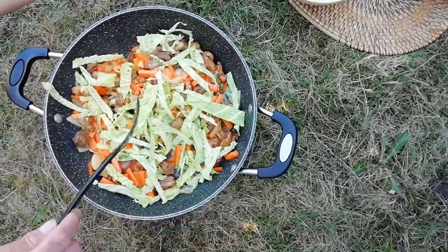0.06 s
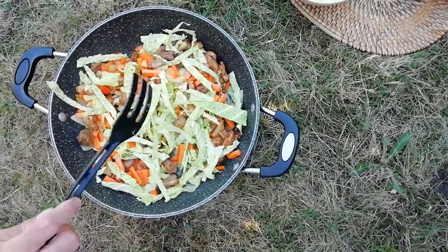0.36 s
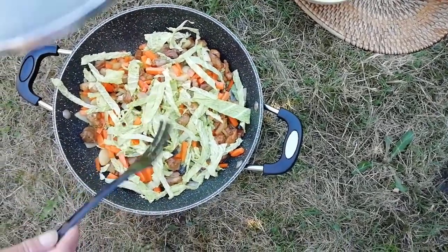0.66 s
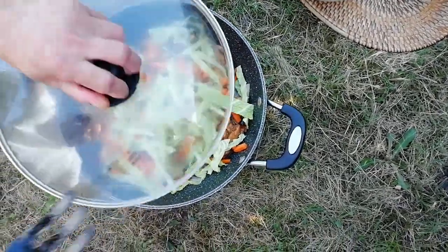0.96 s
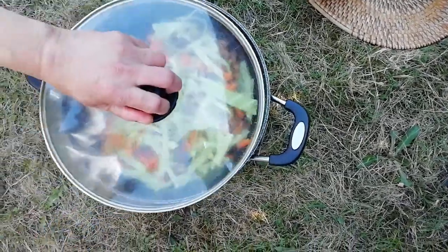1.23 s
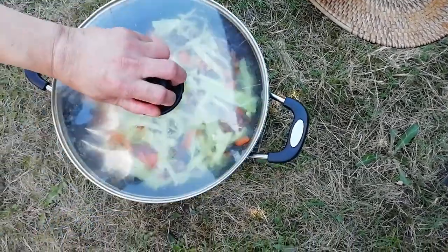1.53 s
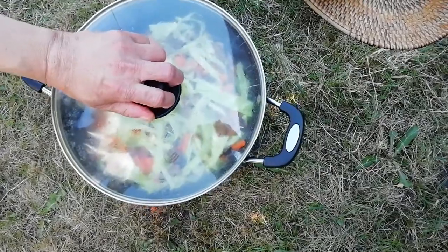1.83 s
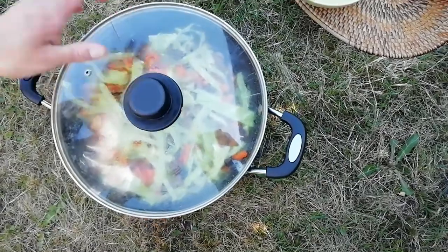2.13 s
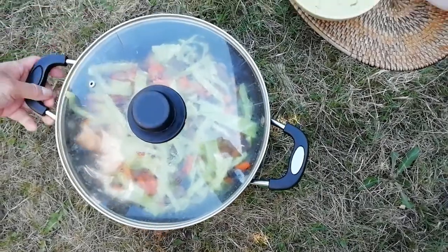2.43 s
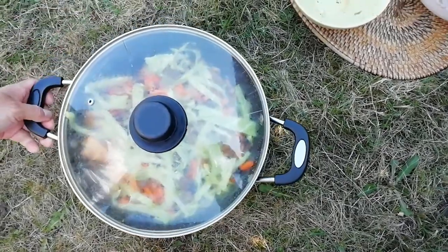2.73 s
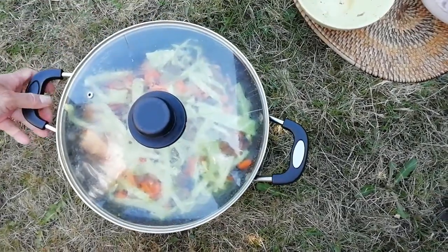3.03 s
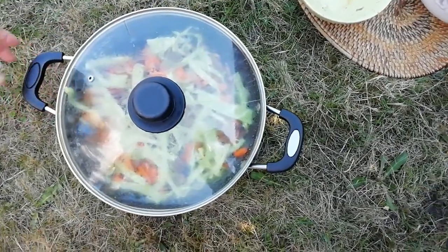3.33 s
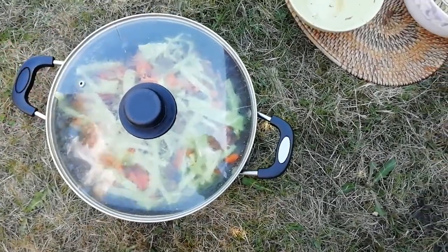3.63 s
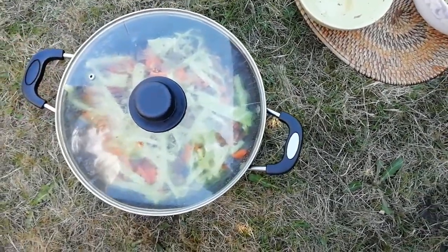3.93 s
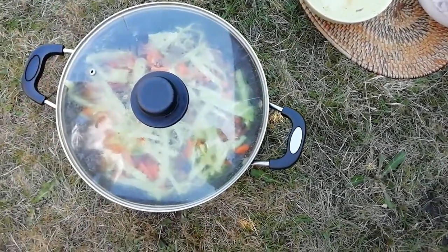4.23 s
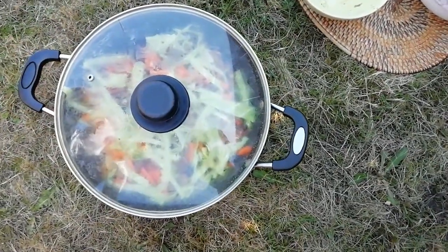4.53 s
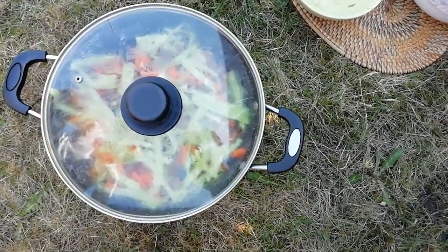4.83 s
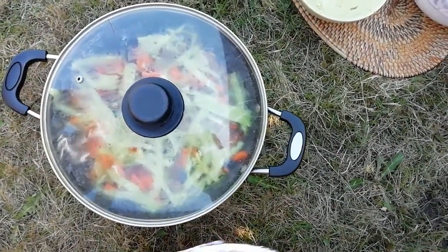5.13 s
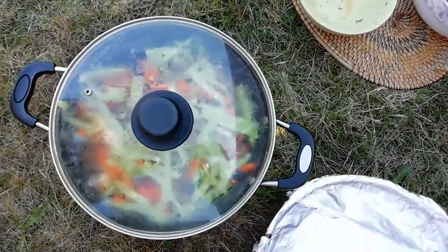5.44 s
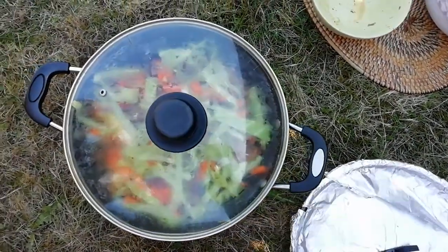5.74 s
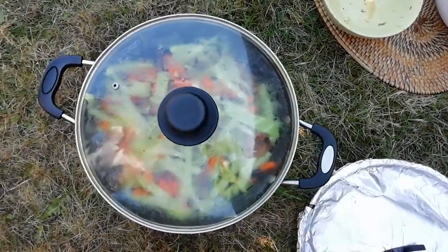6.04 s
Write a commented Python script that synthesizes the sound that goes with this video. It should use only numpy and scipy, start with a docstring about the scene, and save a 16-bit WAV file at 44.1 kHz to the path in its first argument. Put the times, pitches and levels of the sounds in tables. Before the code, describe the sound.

A frying sizzle is shut in by a rattling glass lid, followed by faint birdsong and a crackling bag dragged outdoors.

```python
"""Vegetables sizzle in a frying pan on a lawn as droplets burst in the hot fat. A fork ticks, then
a glass lid clatters onto the rim, rings and shuts the sizzle in. The pan is nudged by its handle;
a foil-lined bag is bumped, dragged crackling over the grass and set down beside it. Small birds
sing in the trees over a far low drone, with one run of faint high ticks. A camera with two
differently coloured microphone ports is held above the pan."""
import sys
import numpy as np
from scipy import signal
from scipy.fft import rfft, irfft, next_fast_len
from scipy.io import wavfile
from scipy.ndimage import map_coordinates

SR = 44100
rng = np.random.default_rng(int(sys.argv[2]) if len(sys.argv) > 2 else 0)


def master_out(mix):
    """Clip the mix to full scale and print it as 16-bit PCM to the path in sys.argv[1]."""
    frames = np.transpose(np.atleast_2d(mix))
    ceiling = np.clip(frames, -1, 1)
    pcm = np.round(ceiling * 32767).astype(np.int16)
    wavfile.write(sys.argv[1], SR, pcm)


N = 268392
T = np.arange(N) / SR


# sizzle leaving the pan: time_s, level_db, covered_share
SIZZLE_ENVELOPE = [(0, -43.5, 0.1), (.45, -43, 0.14), (.72, -42, 0.08), (.9, -44.5, 0.27),
                   (1.05, -49.5, 0.83), (1.35, -54.5, 0.86), (1.6, -57, 1), (1.85, -73, 1), (2.4, -70.5, 1),
                   (3, -78, 0.7)]
# bursting fat: freq_hz, density_db
FAT_SPECTRUM = [(200, -27), (550, -18), (1000, -6), (2000, -1.5), (4500, -1), (8000, -1), (12000, -8),
                (15500, -6)]
# air between food and lid: centre_hz, width_hz, gain_db
CAVITY_MODES = [(1035, 59, 20), (1460, 78, 20), (2090, 430, 6.5), (2700, 270, 4.5)]
# droplet pings: start_s, level_db, pitch_hz
DROPLET_PINGS = [(.823, -36, 5000), (.862, -39, 4670), (.891, -32, 8100), (0.94, -31, 8040),
                 (.975, -35, 7750)]

def sizzle():
    """Droplets burst in hot fat; under the lid the hiss takes on the hollow of the pan."""
    time_s, level_db, covered_share = np.transpose(SIZZLE_ENVELOPE)
    fizz = crackle(rate_hz=2500, spread_db=4, spread_s=0.00006)
    pops = crackle(rate_hz=130, spread_db=3.5, spread_s=0.00006)
    fat = tinted(port_noise(shared=0.45) + amp(-1) * fizz + amp(-6.5) * pops, FAT_SPECTRUM)
    cavity = filtered(fat, lambda hz: resonances(CAVITY_MODES, hz))
    cavity_gain = amp(-8.5) * np.interp(T, time_s, covered_share)
    out = amp(np.interp(T, time_s, level_db) + 1.5 + 0.2 * wobble(24.6)) * (fat + cavity_gain * cavity)
    t = T[:SR // 20]
    for start_s, ping_db, pitch_hz in DROPLET_PINGS:
        add(out, start_s, amp(ping_db) * decay(t, t60_s=0.017) * np.sin(2 * np.pi * pitch_hz * t))
    return out


# lid on the rim: start_s, air_db, clack_db
LID_CONTACTS = [(1.367, -30, -32), (1.3777, -22, -23), (1.383, -35, -22), (1.428, -35, -39),
                (1.517, -30.5, -42), (1.538, -42, -34.5), (1.554, -28.5, -24), (1.572, -27.5, -29),
                (1.635, -21.5, -15), (1.646, -31, -27), (1.662, -30.5, -26), (1.679, -26, -30.5),
                (1.704, -24, -15.5), (1.723, -27, -45), (1.758, -25, -30)]
# steel-rimmed glass: base_hz, level_db, base_t60_s
LID_MODES = [(401, -12.5, 0.16), (507, -9.5, 0.1), (832, -8, 0.11), (906.5, -0.5, 0.11), (1110, -18, 0.064),
             (1420, -24, 0.15), (1683, -19, 0.184), (2110, -23, 0.078), (2355, -17, 0.097),
             (2414, -13.5, 0.1), (2688, -4.5, 0.054), (2910, -8.5, 0.051), (3110, -12, 0.064),
             (4900, -23, 0.053)]
# lid bedding down: time_s, air_hz, pitch_ratio, t60_ratio, glass_db, cutoff_hz
LID_SEATING = [(1.38, 380, 0.97, 0.92, -1, 5000), (1.52, 338, 0.95, 1.5, -3.5, 6500),
               (1.635, 272, .948, 1.09, 0, 3100), (1.704, 193, .94, 0.86, -15, 1500),
               (1.76, 173, .94, 0.93, -19, 1000)]
# hard contact on the pan: freq_hz, density_db
CLACK_SPECTRUM = [(50, -31), (160, 4.5), (450, -2), (650, -9), (1050, 1), (1700, -6.5), (2800, -15),
                  (6000, -11), (15000, -4)]

def lid():
    """Each contact clacks, rings the glass and pumps trapped air; lower and duller as the lid seats."""
    out, t = np.zeros((2, N)), T[:SR // 4]
    base_hz, mode_db, base_t60_s = np.transpose(LID_MODES)[:, :, None]
    for start_s, air_db, clack_db in LID_CONTACTS:
        air_hz, pitch_ratio, t60_ratio, glass_db, cutoff_hz = interpolate(LID_SEATING, start_s)
        # each new point of support shifts the modes
        mode_hz = base_hz * pitch_ratio * (1 + 0.0133 * rng.standard_normal(base_hz.shape))
        polarity = rng.choice([-1, 1], base_hz.shape)
        struck_db = mode_db + 2.4 * rng.standard_normal(base_hz.shape)
        envelopes = polarity * amp(struck_db) * decay(t, base_t60_s * t60_ratio)
        # higher modes reach the ports further out of step
        skew_rad = rng.standard_normal(base_hz.shape) * base_hz / 6000
        phase = 2 * np.pi * mode_hz * t
        ring = np.array([np.sum(envelopes * np.sin(phase + side * skew_rad), axis=0) for side in (-1, 1)])
        add(out, start_s, amp(glass_db + (air_db + clack_db) / 2) * ring)
        # trapped air swells, then leaks through the gap
        air_envelope = (1 - np.exp(-t / 0.0013)) * decay(t, 0.078 * t60_ratio)
        add(out, start_s, amp(air_db + 3) * air_envelope * np.sin(2 * np.pi * air_hz * t))
        clack = burst(CLACK_SPECTRUM, t60_s=0.031, cutoff_hz=cutoff_hz, shared=0.66)
        rattle = burst(CLACK_SPECTRUM, t60_s=0.14 * t60_ratio, cutoff_hz=cutoff_hz, shared=0.33)
        add(out, start_s, amp(clack_db) * (clack + amp(-12.5) * rattle))
    return out


# fork on the pan: start_s, level_db
FORK_TAPS = [(.479, -52), (0.534, -32), (.619, -49)]
# one tap: freq_hz, density_db
FORK_SPECTRUM = [(200, -24), (600, -5), (900, -6), (1700, 9), (3000, -8), (6500, -9), (15000, -16)]

def fork():
    """The fork touches the pan through the food."""
    out = np.zeros((2, N))
    for start_s, level_db in FORK_TAPS:
        tap = burst(FORK_SPECTRUM, t60_s=0.034, cutoff_hz=13000, shared=0.64)
        add(out, start_s, amp(level_db) * tap)
    return out


# hand on the handle: centre_s, level_db, pitch_hz
HANDLE_BUMPS = [(2.234, -49, 70), (2.321, -38, 88), (2.374, -41.5, 137), (2.664, -43, 62),
                (2.7, -42.5, 63.6), (5.966, -48.5, 130)]
# pan shifting on grass: centre_s, half_width_s, level_db
PAN_SHIFTS = [(2.216, 0.06, -45.5), (2.68, 0.079, -51.5)]
# its rumble: freq_hz, density_db
SHIFT_SPECTRUM = [(15, -1), (35, 3), (70, -6.5), (170, -14), (300, -31), (900, -47)]

def pan_nudges(half_width_cycles=0.81):
    """The pan is nudged on soft ground: low pushes with no ring, and a soft rumble as it shifts."""
    pushes = np.zeros(N)
    for centre_s, level_db, pitch_hz in HANDLE_BUMPS:
        cycles = (T - centre_s) * pitch_hz
        pushes += amp(level_db) * np.exp(-(cycles / half_width_cycles) ** 2) * np.sin(2 * np.pi * cycles)
    shifting = sum(amp(level_db) * np.exp(-((T - centre_s) / half_width_s) ** 2)
                   for centre_s, half_width_s, level_db in PAN_SHIFTS)
    return pushes + shifting * tinted(port_noise(shared=0.93), SHIFT_SPECTRUM)


# bag moves: full_speed_s, rise_s, hold_s, fall_s, foil_db, wall_db
BAG_MOVES = [(3.427, 0.092, 0.13, 0.74, -61.5, -70.5), (3.519, .02, 0.017, .9, -72, -65.5),
             (4.193, .006, 0.034, 0.046, -49.5, -66), (4.256, 0.0044, 0.029, 0.031, -45, -57),
             (4.464, .01, 0.011, 0.11, -54, -54.5), (4.734, 0.21, 0.033, 0.075, -37.5, -45.5),
             (4.816, 0.064, 0.15, 0.062, -40.5, -50), (5.011, .01, 0.025, 0.019, -46.5, -54),
             (5.123, 0.018, 0.016, 0.29, -57.5, -67), (5.556, .2, .02, .1, -47, -56),
             (5.584, 0.062, 0.09, 0.14, -30, -37.5), (5.758, .008, .015, 0.08, -35, -39.5)]
# foil lining: freq_hz, density_db
FOIL_SPECTRUM = [(1200, -25.5), (2800, -8), (4500, -2.5), (6200, 2.5), (8000, -0.5), (11000, -0.5),
                 (15500, -1.5)]
# padded wall: freq_hz, density_db
WALL_SPECTRUM = [(150, -26), (400, -13.5), (800, -3), (1500, -0.5), (2600, -2), (4200, -13), (9000, -35)]

def bag_drag(ramp_db=20.5):
    """With each move, foil and fabric catch and slip on the grass."""
    catching = amp(1.82 * wobble(110))
    foil = port_noise(shared=0.075) + amp(-2.5) * crackle(rate_hz=1600, spread_db=5.5, spread_s=0.0002)
    foil += amp(-5) * crackle(rate_hz=110, spread_db=4.5, spread_s=0.0002)
    wall = port_noise(shared=0.44) + amp(-1) * crackle(rate_hz=900, spread_db=4.5, spread_s=0.00017)
    power = np.zeros((2, N))
    for full_speed_s, rise_s, hold_s, fall_s, foil_db, wall_db in BAG_MOVES:
        t = T - full_speed_s
        swell = amp(-ramp_db * (np.maximum(-t, 0) / rise_s + np.maximum(t - hold_s, 0) / fall_s))
        power += np.outer(amp([foil_db + 6.5, wall_db + 2]), swell) ** 2
    foil_gain, wall_gain = np.sqrt(power)
    return catching * (foil_gain * tinted(foil, FOIL_SPECTRUM) + wall_gain * tinted(wall, WALL_SPECTRUM))


# loudest foil creases: start_s, level_db, left_minus_right_db
CREASE_SNAPS = [(4.6633, -28, -3), (4.7261, -15.5, 7), (4.871, -19.5, 3.5), (5.029, -20.5, -1),
                (5.064, -31, 7), (5.2593, -29, 1), (5.3537, -33.5, -9), (5.4607, -28.5, -11),
                (5.5585, -12.5, -10), (5.5891, -7.5, -2), (5.6682, -7, 2), (5.7588, -14, -3)]
# bumps on the bag: start_s, level_db, t60_s
BAG_SCUFFS = [(3.685, -55, 0.028), (4.1849, -25.5, 0.12), (4.205, -26.5, 0.11), (4.218, -29, 0.097),
              (4.237, -34.5, 0.11), (4.255, -38.5, 0.2), (5.776, -38, 0.048)]
# one scuff: freq_hz, density_db
SCUFF_SPECTRUM = [(80, -48), (180, -10), (450, -4.5), (900, 1), (1700, 3.5), (2600, 0.5), (4000, -11.5),
                  (7000, -33), (15000, -28)]

def bag_impacts():
    """Foil creases snap and the padded wall scuffs."""
    out = np.zeros((2, N))
    for start_s, level_db, pan_db in CREASE_SNAPS:
        snap = burst(FOIL_SPECTRUM, t60_s=0.032, cutoff_hz=15000, shared=0.41)
        add(out, start_s, amp(level_db - 9.5) * panned(pan_db) * snap)
    for start_s, level_db, t60_s in BAG_SCUFFS:
        scuff = burst(SCUFF_SPECTRUM, t60_s, cutoff_hz=23000, shared=0.8)
        add(out, start_s, amp(level_db) * panned(-0.91) * scuff)
    return out


# rubbing weave: time_s, pitch_hz, level_db
WEAVE_HUM = [(4.27, 373, -63), (4.31, 402, -59), (4.4, 421, -60.5), (4.5, 483, -61), (4.62, 568, -61.5),
             (4.72, 579, -89)]

def bag_weave():
    """Ribbed fabric hums faintly, higher as it slides faster."""
    time_s, pitch_hz, level_db = np.transpose(WEAVE_HUM)
    hum = tone(np.interp(T, time_s, pitch_hz) * (1 + 0.148 * wobble(160)))
    return amp(np.interp(T, time_s, level_db, left=-120, right=-120)) * hum


# straight glides: start_s, length_s, from_hz, to_hz, level_db
SONG_SLURS = [(3.745, 0.065, 7000, 7250, -46), (3.803, .075, 7480, 8110, -44),
              (4.345, 0.068, 4380, 3600, -43.5), (4.391, .058, 4585, 3840, -42),
              (4.498, 0.025, 5520, 5960, -47.5), (4.618, 0.042, 4760, 4940, -44),
              (4.653, 0.069, 5350, 4220, -39.5), (4.956, .044, 4130, 3270, -42),
              (5.064, .03, 3490, 3035, -37), (5.151, 0.0526, 4250, 4770, -46),
              (5.188, 0.0545, 5150, 5400, -53), (5.213, 0.035, 3850, 3200, -46.5),
              (5.29, 0.036, 3133, 3004, -44)]
# slowing pitch swings: start_s, length_s, centre_hz, swing_count, depth_ratio, level_db
SONG_WARBLES = [(4.099, 0.12, 3240, 1.75, 0.067, -42), (4.992, 0.056, 3647, 0.71, 0.077, -41.5),
                (5.307, .19, 3200, 1.45, .11, -41.5)]

def singing_bird(slowing_exponent=0.8):
    """Slurs and warbles from one perch on the right; higher notes are rougher."""
    out = np.zeros((2, N))
    notes = [(start_s, level_db, np.linspace(from_hz, to_hz, int(length_s * SR)))
             for start_s, length_s, from_hz, to_hz, level_db in SONG_SLURS]
    for start_s, length_s, centre_hz, swing_count, depth_ratio, level_db in SONG_WARBLES:
        swing_rad = 2 * np.pi * swing_count * np.linspace(0, 1, int(length_s * SR)) ** slowing_exponent
        notes.append((start_s, level_db, centre_hz * (1 - depth_ratio * np.cos(swing_rad))))
    for start_s, level_db, glide_hz in notes:
        add(out, start_s, amp(level_db) * whistle(glide_hz, rasp=0.42 * (glide_hz.mean() / 4000) ** 0.6))
    return tree_scatter(panned(-6) * out, direct_db=-3.8, scatter_db=-6.3, t60_s=0.48)


# syllables, two per call: start_s, level_db
CHATTER_SYLLABLES = [(1.945, -53.5), (2.035, -56), (3.283, -49.5), (3.398, -52.5)]

def chattering_bird(pip_s=0.042, fall_s=0.055, fall_delay_s=0.022):
    """Each syllable is a short pip and a rasping fall."""
    out = np.zeros((2, N))
    pip_hz = np.full(int(pip_s * SR), 4120)
    fall_hz = np.linspace(3700, 2970, int(fall_s * SR))
    for start_s, level_db in CHATTER_SYLLABLES:
        add(out, start_s, amp(level_db - 2.5) * panned(1.8) * whistle(pip_hz, rasp=0.6))
        add(out, start_s + fall_delay_s, amp(level_db) * panned(-7) * whistle(fall_hz, rasp=1.88))
    return tree_scatter(out, direct_db=-6, scatter_db=-2.5, t60_s=0.55)


def whistle(glide_hz, rasp, right_lead_s=0.00016):
    """One gliding bird note, roughened by fast flutter and swelling unevenly; rms 1."""
    t, progress = T[:len(glide_hz)], np.linspace(0, 1, len(glide_hz))
    flutter, swelling = (map_coordinates(rng.standard_normal(512), [t * hz]) for hz in (600, 90))
    pitch_hz = glide_hz * (1 + 0.063 * rasp * np.tanh(flutter))
    phase = 2 * np.pi * (np.cumsum(pitch_hz) / SR + np.outer([0, right_lead_s], pitch_hz))
    envelope = (progress * (1 - progress)) ** 0.6 * amp(1.9 * swelling)
    return unit_rms(envelope * np.sin(phase))


def tree_scatter(x, direct_db, scatter_db, t60_s):
    """A far sound plus the diffuse tail that the trees scatter back."""
    t = T[:SR]
    tail = rng.standard_normal((2, SR)) * decay(t, t60_s) * (1 - np.exp(-t / 0.00074))
    scattered = signal.fftconvolve(x, tail / np.linalg.norm(tail[0]), axes=1)[:, :N]
    return amp(direct_db) * x + amp(scatter_db) * scattered


def high_ticks(count=6, start_s=3.857, spacing_s=0.0205, pitch_hz=14400, level_db=-51):
    """A quick even run of faint, very high ticks."""
    out, t = np.zeros((2, N)), T[:SR // 50]
    tick = amp(level_db) * decay(t, t60_s=0.007) * np.sin(2 * np.pi * pitch_hz * t)
    for k in range(count):
        add(out, start_s + k * spacing_s, tick)
    return out


# far drone: time_s, rumble_db, hum_db
DRONE_ENVELOPE = [(0, -59.5, -60.5), (2, -59, -59), (3.1, -63.5, -65), (3.85, -62, -56.5),
                  (4.4, -62.5, -68), (6.08, -63, -72)]
# far rumble: freq_hz, density_db
RUMBLE_SPECTRUM = [(15, 0), (35, 1), (60, -1.5), (79, 2.5), (100, -7.5), (135, -8), (168, -4.5), (215, -15),
                   (400, -24), (900, -56)]
# outdoor hiss: freq_hz, density_db
HISS_SPECTRUM = [(100, 3.5), (450, 0), (1200, 4.5), (2500, 1.5), (4500, -0.5), (7000, 0), (11000, -6.5),
                 (15500, -1)]

def outdoors(hum_hz=77.8):
    """A far low rumble with a wavering hum in it, and a faint even hiss."""
    rumble_db, hum_db = interpolate(DRONE_ENVELOPE, T)
    rumble = amp(rumble_db + 1.5 + wobble(6.16)) * tinted(port_noise(shared=1), RUMBLE_SPECTRUM)
    hum = amp(hum_db + 2 * wobble(14)) * tone(hum_hz * (1 + 0.04 * wobble(13)))
    hiss = amp(-61.5 + 0.83 * wobble(5.387)) * tinted(port_noise(shared=0.052), HISS_SPECTRUM)
    return rumble + hum + hiss


def crackle(rate_hz, spread_db, spread_s):
    """Tiny snaps of uneven size, each from its own direction; rms 1."""
    count = int(rate_hz * N / SR)
    position, size, direction = rng.random(count), rng.standard_normal(count), rng.uniform(-1, 1, count)
    snaps = amp(spread_db * np.minimum(size, 3)) * rng.choice([-1, 1], count)
    arrivals = [(position * N + side * direction * spread_s * SR).astype(int) % N for side in (-1, 1)]
    return unit_rms(np.array([np.bincount(samples, snaps, N) for samples in arrivals]))


def burst(spectrum, t60_s, cutoff_hz, shared):
    """Contact noise that dies fast; a softer contact has a lower cutoff."""
    t = T[:SR // 4]
    noise = port_noise(shared, size=len(t))
    dulled = filtered(noise, lambda hz: colour(spectrum, hz) / np.sqrt(1 + (hz / cutoff_hz) ** 4))
    return unit_rms(dulled) * decay(t, t60_s)


def port_noise(shared, size=N):
    """White noise at two ports that share part of its power."""
    common = rng.standard_normal(size)
    return np.sqrt(shared) * common + np.sqrt(1 - shared) * rng.standard_normal((2, size))


def resonances(modes, hz):
    """Response of parallel band-pass resonators."""
    return sum(amp(gain_db) * 1j * hz * width_hz / (centre_hz ** 2 - hz ** 2 + 1j * hz * width_hz)
               for centre_hz, width_hz, gain_db in modes)


def colour(spectrum, hz):
    """Gain between spectrum points on a log frequency axis."""
    freq_hz, gain_db = np.transpose(spectrum)
    return amp(np.interp(np.log(hz + 1), np.log(freq_hz), gain_db))


def filtered(x, response):
    """Apply a frequency response."""
    size = x.shape[-1]
    padded = next_fast_len(size + 8192)
    return irfft(rfft(x, padded) * response(np.fft.rfftfreq(padded, 1 / SR)), padded)[..., :size]


def tinted(x, spectrum):
    """Shape by a spectrum; rms 1."""
    return unit_rms(filtered(x, lambda hz: colour(spectrum, hz)))


def interpolate(table, at):
    """The other columns at a value of the first."""
    axis, *columns = np.transpose(table)
    return [np.interp(at, axis, column) for column in columns]


def wobble(rate_hz):
    """Smooth random curve."""
    return map_coordinates(rng.standard_normal(int(N * rate_hz / SR) + 4), [T * rate_hz])


def tone(pitch_hz):
    return np.sin(2 * np.pi * np.cumsum(pitch_hz) / SR)


def decay(t, t60_s):
    return amp(-60 * t / t60_s)


def amp(db):
    return 10 ** (np.asarray(db) / 20)


def unit_rms(x):
    return x / np.sqrt(np.mean(x ** 2) + 1e-20)


def panned(left_minus_right_db):
    return amp([[left_minus_right_db / 2], [-left_minus_right_db / 2]])


def add(track, start_s, sound):
    part = track[:, round(start_s * SR):][:, :sound.shape[-1]]
    part += sound[..., :part.shape[1]]


def scene():
    """Pan, bag, birds and background."""
    pan = sizzle() + fork() + lid() + pan_nudges()
    bag = bag_drag() + bag_weave() + bag_impacts()
    return pan + bag + chattering_bird() + singing_bird() + high_ticks() + outdoors()


# left port: freq_hz, gain_db
LEFT_RESPONSE = [(380, 1.5), (750, 3), (1400, -3), (3200, 3), (6200, -4), (7600, -9.5), (9000, -9.5),
                 (10000, -3), (13000, 1.5), (14900, 5.5), (15700, -1)]
# right port: freq_hz, gain_db
RIGHT_RESPONSE = [(380, 2), (750, -0.5), (1400, 2.5), (2300, 3.5), (3400, -3.5), (4400, 0.5), (6400, 1.5),
                  (8000, 0), (9000, -5.5), (10100, -2), (11900, -8.5), (14900, -7), (15700, -18.5)]
# left port ahead of right: freq_hz, lead_rad
PORT_LEAD = [(380, 0), (560, 2), (900, 1), (1350, 0.97), (2600, 3.5), (16000, 20)]
SHARED_BELOW_HZ, BAND_LIMIT_HZ = 300, 15850

def record(dry):
    """Two band-limited ports share the bass; each colours and delays the sound in its own way."""
    def response(hz):
        gains = np.array([colour(LEFT_RESPONSE, hz), colour(RIGHT_RESPONSE, hz)])
        lead_rad = np.interp(hz, *np.transpose(PORT_LEAD))
        return gains * np.exp(0.5j * np.outer([1, -1], lead_rad)) * (hz < BAND_LIMIT_HZ)

    mid = dry.mean(axis=0)
    side = filtered(dry - mid, lambda hz: hz / np.hypot(hz, SHARED_BELOW_HZ))
    return filtered(mid + side, response)


dry = scene()
out = record(dry)
master_out(out)
```